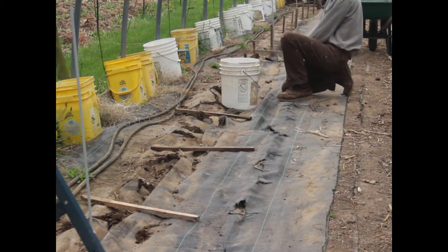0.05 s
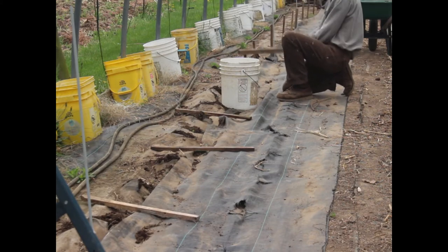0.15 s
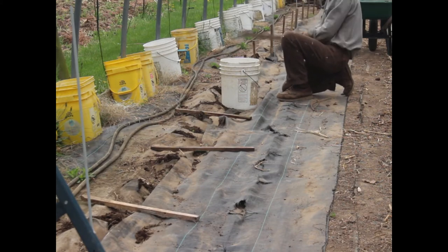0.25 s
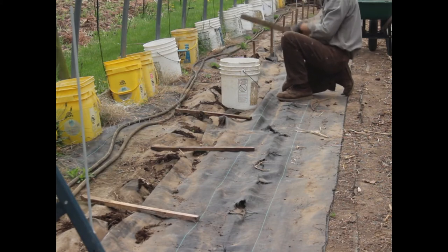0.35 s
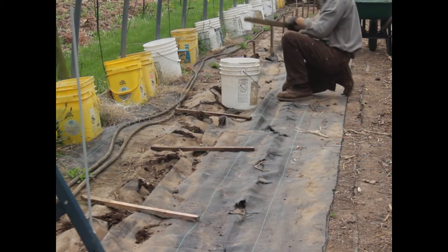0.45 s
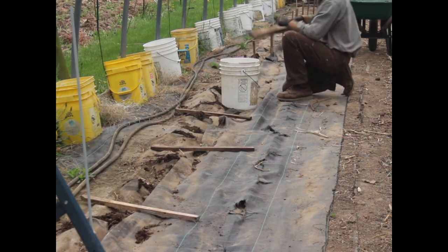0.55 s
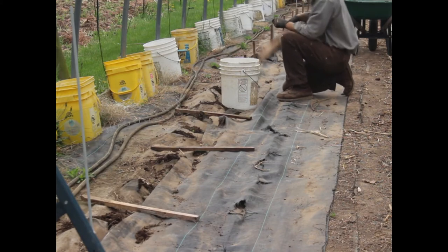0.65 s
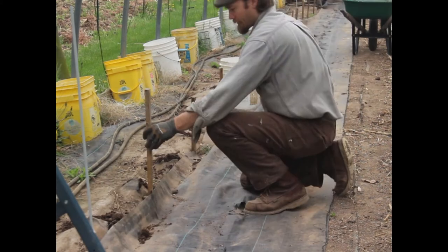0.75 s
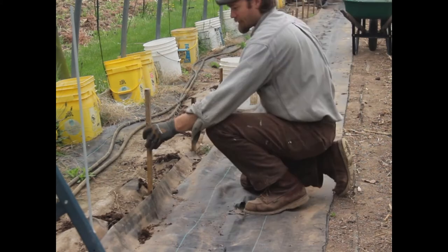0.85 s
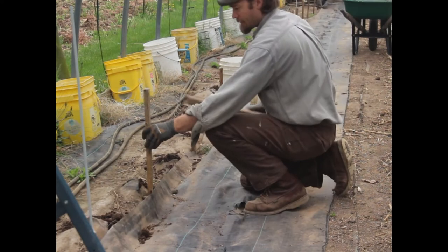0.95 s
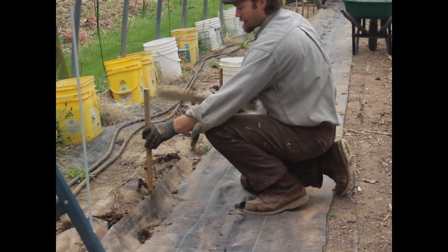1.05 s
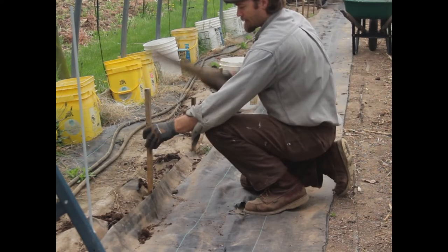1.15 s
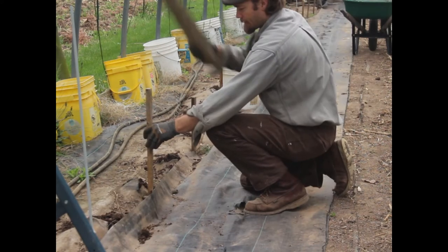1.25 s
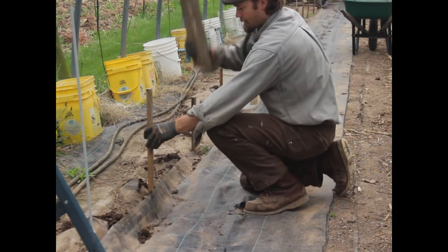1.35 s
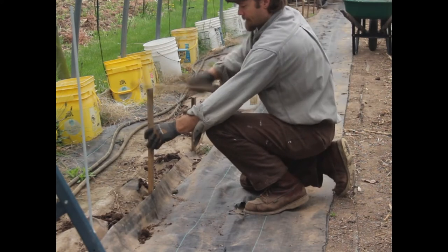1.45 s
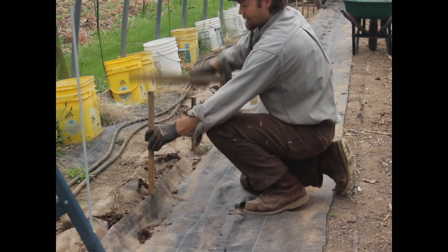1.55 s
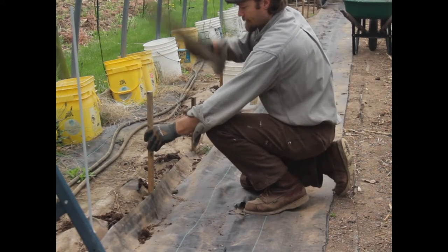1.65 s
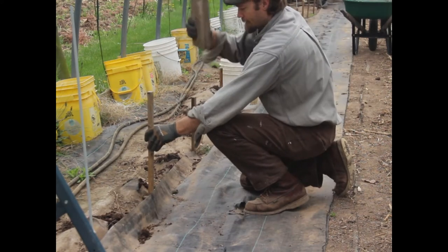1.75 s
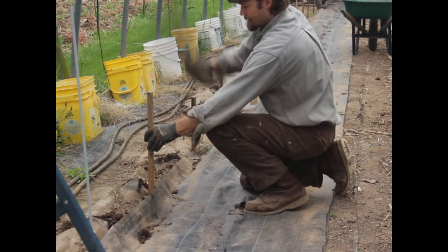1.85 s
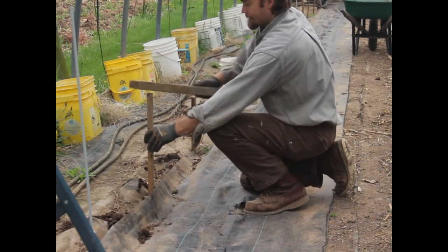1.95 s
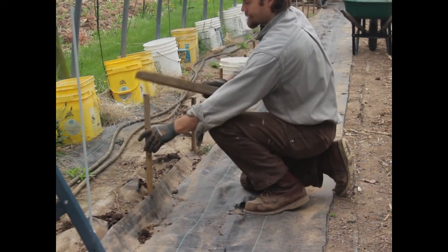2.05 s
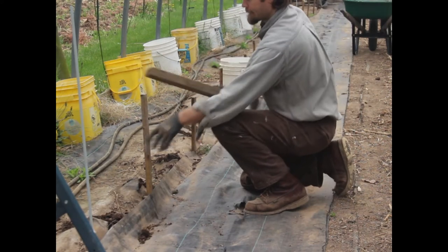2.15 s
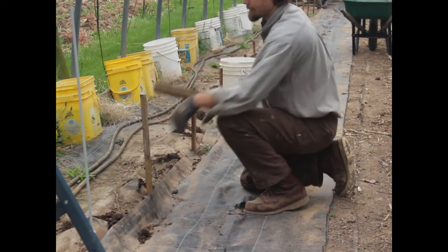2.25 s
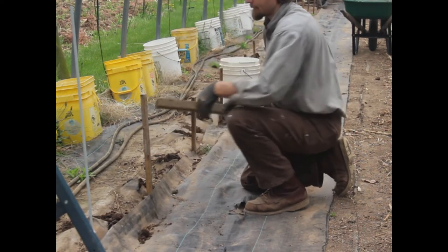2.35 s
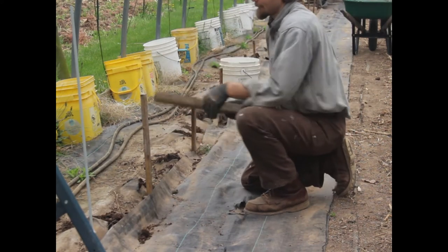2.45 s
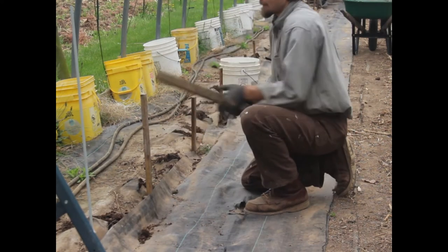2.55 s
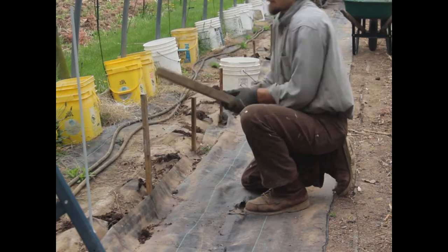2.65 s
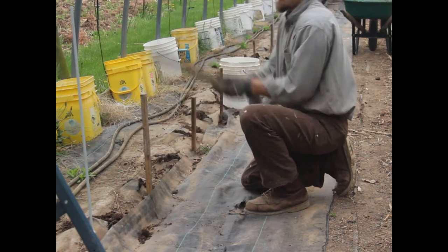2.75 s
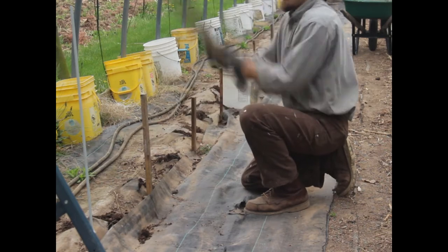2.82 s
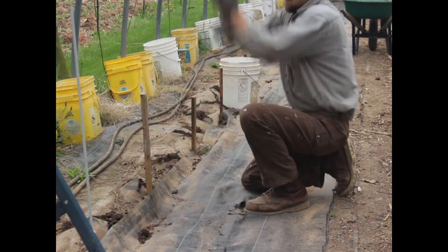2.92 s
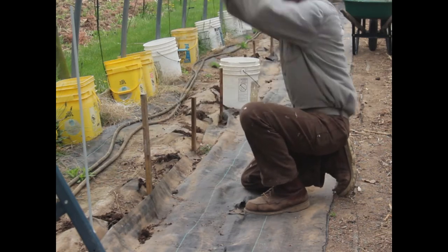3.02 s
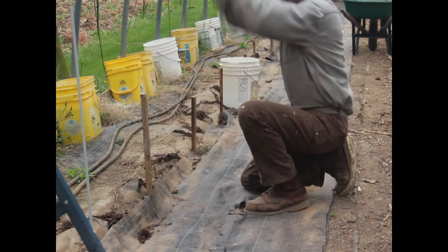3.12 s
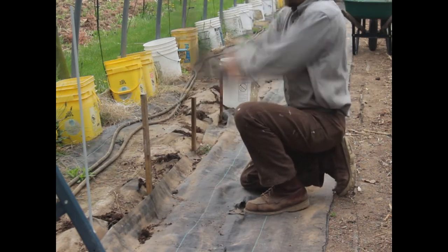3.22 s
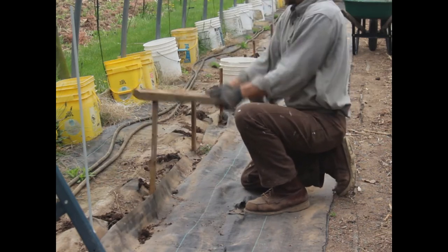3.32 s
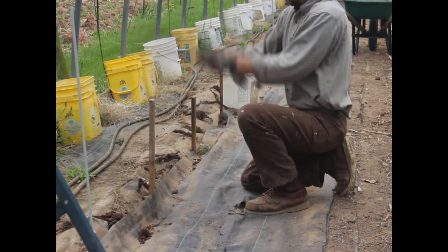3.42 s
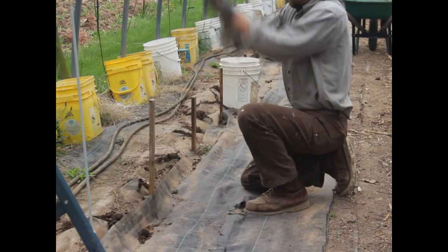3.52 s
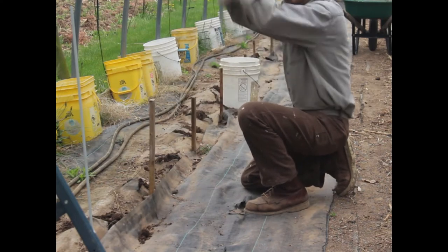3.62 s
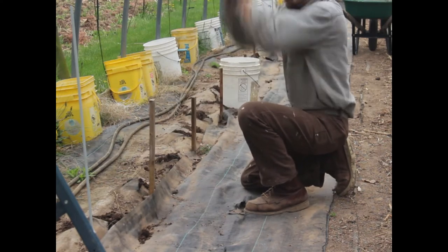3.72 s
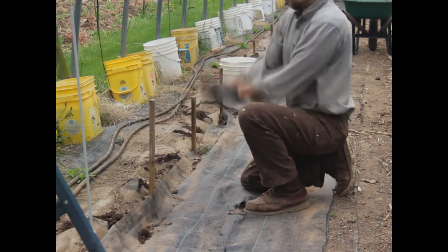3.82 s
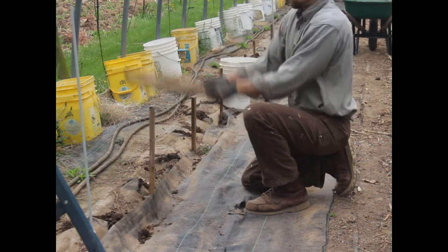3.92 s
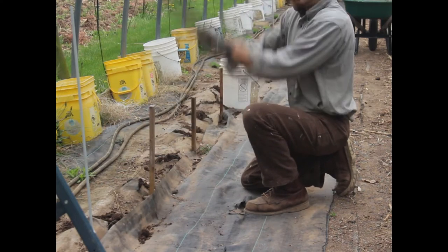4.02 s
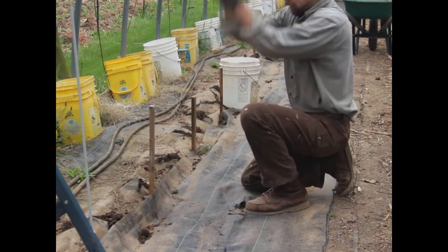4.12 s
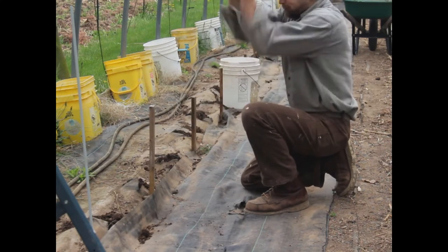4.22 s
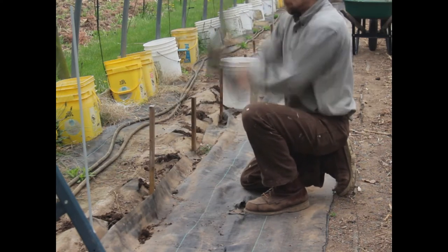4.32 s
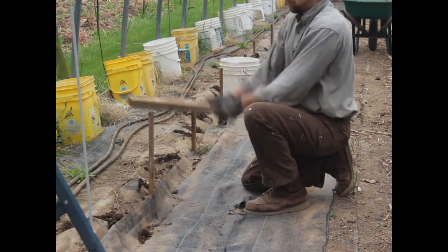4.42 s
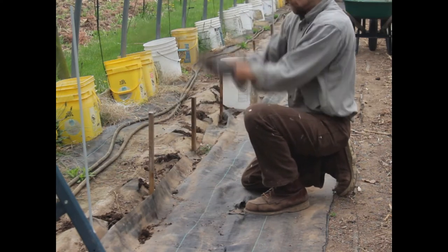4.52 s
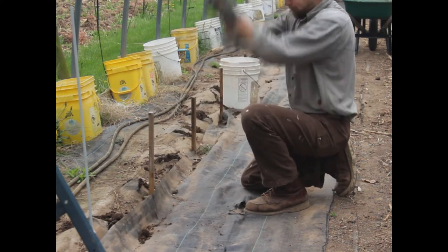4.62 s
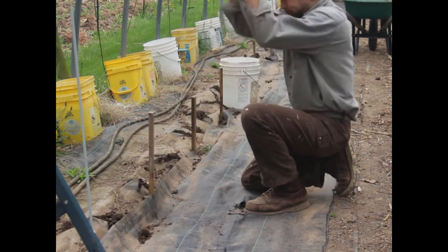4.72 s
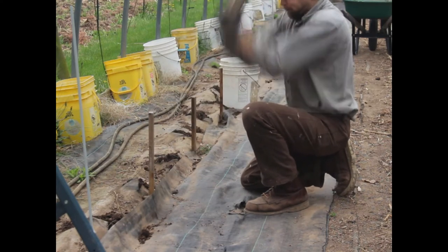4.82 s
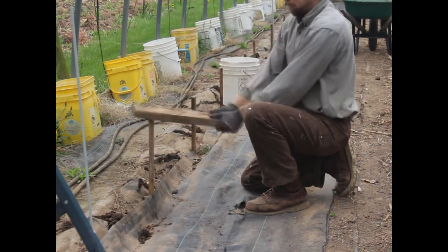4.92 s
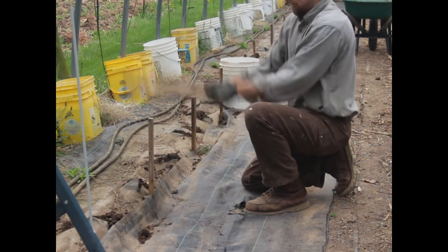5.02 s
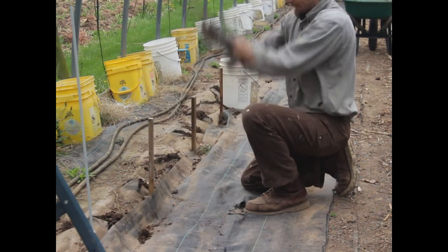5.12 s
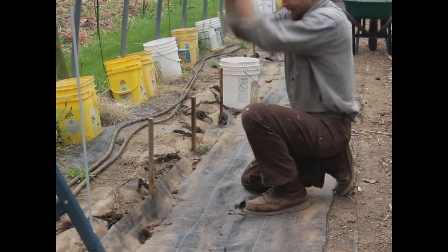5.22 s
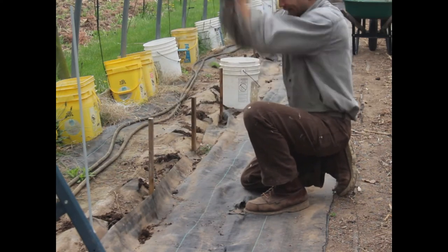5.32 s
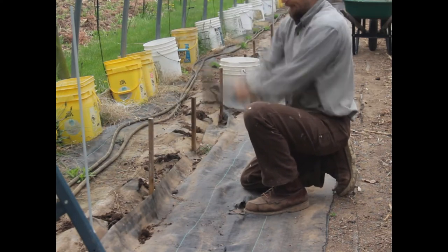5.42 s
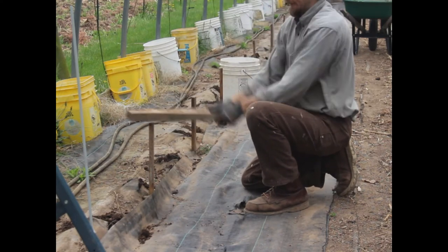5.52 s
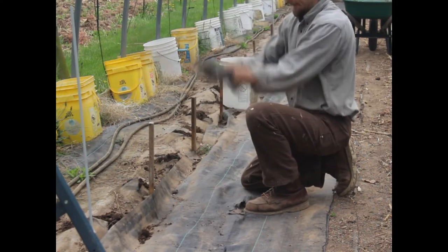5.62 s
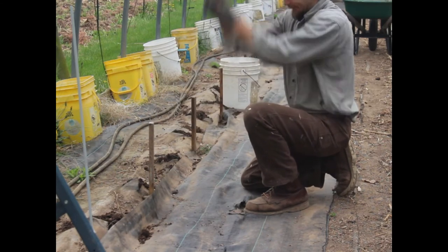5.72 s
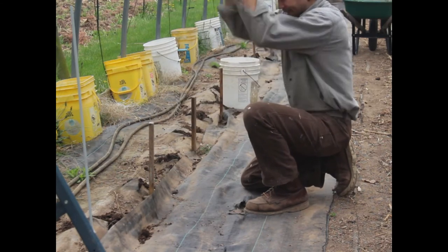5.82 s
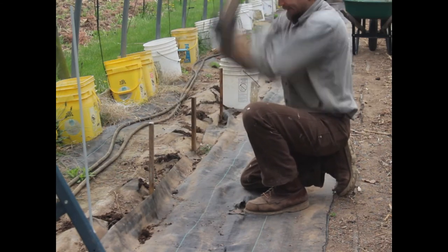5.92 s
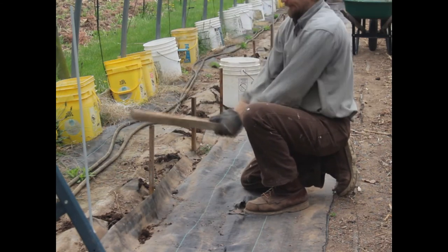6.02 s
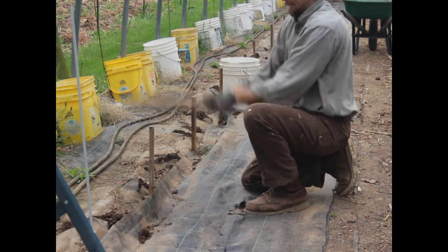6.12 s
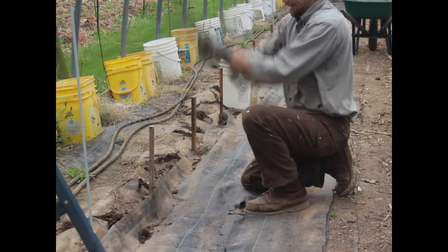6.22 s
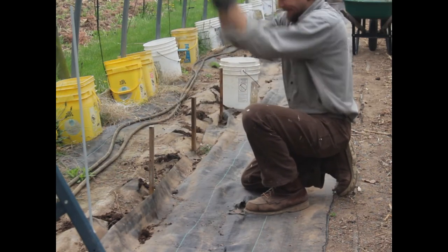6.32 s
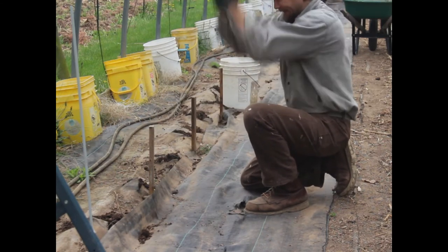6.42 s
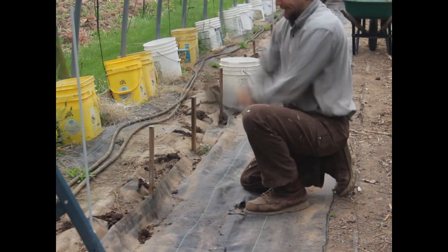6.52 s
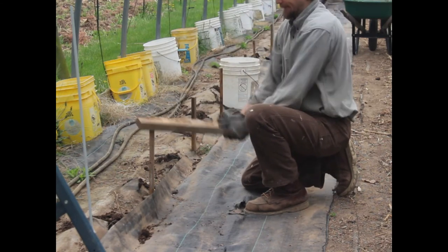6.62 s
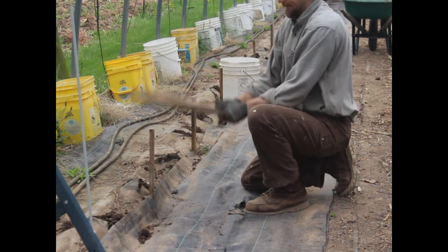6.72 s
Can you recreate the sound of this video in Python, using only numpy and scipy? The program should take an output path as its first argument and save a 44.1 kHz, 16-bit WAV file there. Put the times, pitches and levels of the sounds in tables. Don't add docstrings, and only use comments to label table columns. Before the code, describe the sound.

A wooden club cracks down on thin stakes, ten sharp knocks with soil thumps, each ringing through a long tunnel, faint birds between.

```python
import sys
import numpy as np
from scipy import signal
from scipy.fft import rfft, irfft
from scipy.io import wavfile
from scipy.ndimage import uniform_filter1d

SR = 44100
rng = np.random.default_rng(int(sys.argv[2]) if len(sys.argv) > 2 else 0)


def generate_wav(sig):
    pcm = np.round(np.clip(np.atleast_2d(sig).T, -1, 1) * 32767).astype(np.int16)
    wavfile.write(sys.argv[1], SR, pcm)


def level_to_linear(level):
    exponent = np.asarray(level, float) / 20
    return 10 ** exponent


N = 298468
SCENE_CHANGE_S = .772

# start in
# seconds, force in dB, sharpness in dB, landing spot from about -0.4 to 1.6, echo level in dB.
BLOWS = [
    (.0940, 3, 7, 0.21, 0),
    (1.4899, -0.5, -8.5, -0.42, -8.5),
    (1.9181, 1.5, 0.5, 1.58, -7),
    (3.2825, 2, -4.5, 0.15, -3.5),
    (3.8684, 6, -12.5, -0.044, -0.9),
    (4.3987, 6.5, 1.5, -0.059, -1.1),
    (4.9387, 7, 1, -0.028, 0.5),
    (5.4832, 8.5, 0.5, 0.24, -2),
    (6.0388, 6, 5.5, 0.23, 1.5),
    (6.5852, 5.5, 7.5, 0.071, 0.3),
]


def evened(x):
    return x / np.sqrt(np.mean(x ** 2) + 1e-20)


def read(points, hz):
    f, value = np.transpose(points)
    return np.interp(np.log(hz + 1), np.log(f + 1), value)


def add(mix, s, sound):
    part = mix[max(round(s * SR), 0):][:len(sound)]
    part += sound[:len(part)]


def resonate(x, hz, width_hz):
    turn = np.exp(2j * np.pi * np.cumsum(hz * np.ones(len(x))) / SR)
    r = np.exp(-np.pi * width_hz / SR)
    return 2 * (turn * signal.lfilter([1 - r], [1, -r], x / turn + 1e-18)).real


def resonate_twice(x, hz, width_1_hz, width_2_hz):
    return evened(resonate(resonate(x, hz, width_1_hz), hz, width_2_hz))


def ring(modes, t, shift=0.93, phase=0.):
    return sum(level_to_linear(db - 60 * t / t60_s) * np.sin(2 * np.pi * hz * shift * t + phase) for hz, db, t60_s in modes)


def noise(field_db, size):
    a, b = rng.standard_normal(field_db.shape[::-1] + (2,)).T
    return signal.istft((a + 1j * b) * level_to_linear(field_db), nperseg=size, noverlap=size * 3 // 4)[1]


def stroke(s):
    # valid from in seconds, low mode level in dB, gain drop in dB, echo tilt in dB per octave,
    # echo treble in dB.
    strokes = [
        (0, -10.5, 8.5, 0, 14.5),
        (1.2, -15, 8, -2.5, 15),
        (1.7, -3.5, 10.5, -2.2, 24),
        (3, -0.5, 11, 0.5, 9.5),
        (3.6, 1, 18, 2.1, 10),
    ]
    return [row[1:] for row in strokes if row[0] <= s][-1]


def blow(low_db, force_db, sharp_db, spot):
    # frequency in Hz, level in dB, t60 in seconds, dB per unit of landing spot.
    wood_modes = [(525, 2.5, .02, 0.1), (1430, -3.5, .04, -6), (1650, -2.5, .048, 5),
                  (2660, -10, .045, 1.5), (790, -3, .016, 1.5), (960, -5, .014, -2.5),
                  (1150, -12, .012, 1.5), (1900, -3, .012, 1.5), (2200, -3, .014, -1.2),
                  (2950, -24, .03, 0.1)]
    # frequency in Hz, level in dB, t60 in seconds.
    edge_modes = [(2130, -3.5, 0.0018), (3580, -16, 0.0025), (4164, 2, 0.0031), (5920, -7.5, 0.003)]
    t = np.arange(4000) / SR
    wood = np.zeros(4000)
    for hz, db, t60_s, lean_db in wood_modes:
        mode = (hz, db + lean_db * spot + low_db * (hz < 700), t60_s)
        wood += ring([mode], t, phase=np.pi) * (1 - np.exp(-t * hz / 0.42))
    band = signal.butter(2, [350, 2400], "band", fs=SR, output="sos")
    body = level_to_linear(-5 - 60 * t / 0.023) * evened(signal.sosfilt(band, rng.standard_normal(4000)))
    thump = ring([(189, -14.5 + 1.3 * sharp_db, .045)], t) * (1 - np.exp(-(t / .005) ** 2))
    crack_db = -17 + 0.21 * sharp_db - 60 * t / 0.0029
    crack, other = level_to_linear(crack_db) * np.diff(rng.standard_normal((2, 4001)))
    edge = level_to_linear(-6 + sharp_db) * ring(edge_modes, t, rng.uniform(.97, 1.05))
    sound = wood + body
    add(sound, .003, level_to_linear(-15.5) * sound)
    sound += edge + crack
    return level_to_linear(force_db) * (sound + thump), level_to_linear(force_db) * other


def swish(low_db, drop_db):
    level_db = -54.5 + 0.65 * drop_db + 1.48 * low_db
    rising = resonate(rng.standard_normal(4000), np.linspace(400, 700, 4000), 620)
    to_impact_s = np.arange(-4000, 0) / SR
    return level_to_linear(level_db) * evened(resonate(rising, 500, 1800)) * np.exp(-((to_impact_s + .028) / .028) ** 2)


def tunnel():
    # delay in seconds, level in dB, spread in seconds, dullness in dB per octave.
    bunches = [(.01, 6, 0.02, -3.5), (0.041, 11.5, 0.014, -1), (0.089, 8, 0.024, 1.5),
               (0.131, 3.5, 0.019, 2.5), (.17, 3.5, 0.011, -7.5), (.22, 3, 0.012, -11.5),
               (.32, -48, 0.087, -43)]
    # frequency in Hz, t60 in seconds.
    tunnel_t60 = [(150, 0.17), (500, 1.2), (1000, 3), (1570, 2.15), (2600, 1.006), (5000, 0.95),
                  (10000, 0.74)]
    # frequency in Hz, level in dB.
    colour = [(100, -4), (300, -10.5), (480, -6.5), (800, -1.5), (1050, -5), (1330, 3), (1610, -1),
              (1950, -7.5), (2600, -2.5), (3300, -14.5), (3900, -20), (5500, -32.5), (8000, -45),
              (15000, -60)]
    hz, t = np.fft.rfftfreq(256, 1 / SR)[:, None], np.arange(SR // 64) * 64 / SR
    power = level_to_linear(-5.0) ** 2 * (t > .03)
    for delay_s, db, spread_s, dull_db in bunches:
        late = np.clip(t - delay_s, 0, None) / spread_s
        power = power + level_to_linear(db + dull_db * np.log2(hz / 1500 + 0.2)) ** 2 * late * np.exp(1 - late)
    lumps = uniform_filter1d(rng.standard_normal((len(t), 129)).T, 14, 0)
    lumps = evened(uniform_filter1d(lumps, 5, 1))
    field_db = 10 * np.log10(power + 1e-12) + 1.42 * lumps - 60 * t / read(tunnel_t60, hz)
    tail = noise(field_db, size=256)
    tail = irfft(rfft(tail) * level_to_linear(read(colour, np.fft.rfftfreq(len(tail), 1 / SR))), len(tail))
    return level_to_linear(-7) * tail / np.linalg.norm(tail)


def tilted(x, db_per_octave, treble_db, twin_db):
    hz = np.fft.rfftfreq(len(x), 1 / SR)
    tilt_db = db_per_octave * np.log2(hz / 1500 + 0.25)
    lift_db = treble_db / (1 + (3500 / (hz + 1)) ** 4)
    twin = twin_db * np.exp(-((hz - 1230) / 150) ** 2)
    return irfft(rfft(x) * level_to_linear(tilt_db + lift_db + twin), len(x))


def wall_echo(direct, tails):
    # delay in seconds, level in dB.
    slaps = [(0.041, -41), (0.055, -26), (0.099, -28)]
    sent = level_to_linear(-10.) * direct * np.exp(-np.arange(len(direct)) / SR / .004)
    sent[0] += level_to_linear(26.0)
    turn = rng.uniform(-.8, .8)
    echo = signal.fftconvolve(sent, np.cos(turn) * tails[0] + np.sin(turn) * tails[1])[:SR]
    for delay_s, db in slaps:
        add(echo, delay_s, level_to_linear(db) * uniform_filter1d(direct, size=9))
    return echo


def fuzzy_ring(t, spot, echo_db):
    width_hz = 85 * np.exp(-0.19 * spot)
    level_db = echo_db - 26 + 2.5 * spot + 14.5
    fuzz = resonate_twice(rng.standard_normal(SR), 1590, width_hz, 2 * width_hz)
    fuzz += level_to_linear(-13 - 10 * t) * resonate_twice(rng.standard_normal(SR), 2608, width_hz, 2 * width_hz)
    lull = 1 - .85 * np.exp(-((t - .033) / .008) ** 2) - np.exp(-t / .005)
    return level_to_linear(level_db - 60 * t / 0.65) * fuzz * lull


def boom(t, drop_db):
    # frequency in Hz, level in dB, t60 in seconds.
    boom_modes = [(52.2, 3, 1.03), (74.1, 12.5, 0.66)]
    return level_to_linear(-44 + 0.54 * drop_db) * ring(boom_modes, t) * (1 - np.exp(-(t / 0.045) ** 2))


def hammering():
    out, side, t = np.zeros(N), np.zeros(N), np.arange(SR) / SR
    tails = tunnel(), tunnel(), tunnel()
    for s, force_db, sharp_db, spot, echo_db in BLOWS:
        low_db, drop_db, tilt_db, treble_db = stroke(s)
        direct, other = blow(low_db, force_db, sharp_db, spot)
        echo = wall_echo(direct, tails)
        after = fuzzy_ring(t, spot, echo_db) + boom(t, drop_db)
        after[:len(echo)] += level_to_linear(echo_db) * tilted(echo, tilt_db, treble_db + 0.29 * sharp_db, spot)
        alive = t < (SCENE_CHANGE_S - s if s < SCENE_CHANGE_S else 1)
        add(out, s - 4000 / SR, swish(low_db, drop_db))
        add(out, s, direct)
        add(out, s, after * alive)
        add(side, s, level_to_linear(-1.5) * other)
        add(side, s, level_to_linear(echo_db + 3.0) * tails[2])
    return out, signal.sosfilt(signal.butter(4, 4800, "high", fs=SR, output="sos"), side)


def ticks():
    # start in seconds, level in dB.
    clicks = [(0.9632, -35), (2.7506, -41), (5.38, -35.5), (5.876, -37)]
    # start in seconds, level in dB, frequency in Hz.
    knocks = [(0.136, -33, 217), (0.2, -41, 233), (0.294, -35.5, 104), (0.419, -41, 162),
              (0.55, -48.5, 106), (0.65, -53, 109), (6.236, -41, 154), (6.649, -18.5, 168)]
    out, t = np.zeros(N), np.arange(2000) / SR
    for s, db in clicks:
        add(out, s, level_to_linear(db - 9 - 60 * t / 0.019) * rng.standard_normal(2000))
    for s, db, hz in knocks:
        add(out, s, ring([(hz, db + 10.5, .07)], t) * (1 - np.exp(-(t / 0.0025) ** 2)))
    return out


def birds():
    # start in seconds, length in seconds, frequency in Hz, glide in Hz, level in dB.
    whistles = [(0, .09, 1970, -57, -37.5), (0.032, 0.043, 4670, 45, -53.5), (0.409, 0.05, 4730, 12, -48),
                (0.436, 0.022, 4600, -1500, -56), (0.462, .05, 2800, 170, -48),
                (0.767, .18, 2768, -22, -47), (0.954, 0.25, 2717, -65, -47.5), (2.452, 0.12, 3750, 9, -57),
                (2.588, 0.17, 3740, 9, -56), (2.5, .33, 5100, 50, -67), (2.443, .5, 2320, -78, -57),
                (2.754, 0.283, 2720, -54, -55.5), (3.06, 0.28, 2620, 22, -58),
                (4.79, 0.28, 3340, -27, -71.5), (4.793, 0.29, 2720, 36, -50)]
    # time of the top in seconds, level in dB.
    chirps = [(.603, -55), (.74, -59)]
    # start in seconds, length in seconds, level in dB, frequency in Hz.
    flock = [(0.762, 0.68, -56.5, 2680), (2.431, 0.34, -55.5, 2740), (2.74, .54, -50, 2850)]
    out, calls = np.zeros(N), []
    for s, length_s, hz, glide_hz, db in whistles:
        calls.append((s, np.linspace(hz, hz + glide_hz, round(length_s * SR)), db))
    rise_s, fall_s = .022, .052
    t = np.arange(-rise_s, fall_s, 1 / SR)
    hook_hz = 5380 - np.minimum(2.2e6 * t ** 2, 56000 * abs(t))
    for top_s, db in chirps:
        calls.append((top_s - rise_s, hook_hz, db))
    for s, pitch_hz, db in calls:
        blur = evened(resonate(rng.standard_normal(SR // 2)[:len(pitch_hz)], pitch_hz, 65))
        whistle = .65 * np.sin(2 * np.pi * np.cumsum(pitch_hz) / SR) + .85 * blur
        add(out, s, level_to_linear(db) * whistle * signal.windows.tukey(len(pitch_hz), .2))
    fading = level_to_linear(-60 * np.arange(SR // 4) / SR / .25) * rng.standard_normal(SR // 4)
    out = .8 * out + .35 * signal.fftconvolve(out, fading / np.linalg.norm(fading))[:N]
    chatter_db, chatter_s = 2.2, .05
    for s, length_s, db, hz in flock:
        hiss, chance = rng.standard_normal((2, SR))[:, :round(length_s * SR)]
        chatter = evened(signal.lfilter([1], [1, -np.exp(-1 / (chatter_s * SR))], chance))
        smear = resonate_twice(hiss, hz, 800, 800)
        add(out, s, level_to_linear(db - 4 + chatter_db * chatter) * smear * signal.windows.tukey(len(hiss), .05))
    return out


def steady_noise(spectrum, level_db, swell_db, patchy_db):
    hz, t = np.fft.rfftfreq(1024, 1 / SR)[:, None], np.arange(N // 256 + 5) * 256 / SR
    patches = uniform_filter1d(rng.standard_normal((len(t), 513)).T, 10, 0)
    patches = evened(uniform_filter1d(patches, 12, 1))
    field_db = read(spectrum, hz) + patchy_db * patches + swell_db(t) / (1 + (hz / 1400) ** 2)
    return level_to_linear(level_db) * evened(noise(field_db, size=1024)[:N])


def outdoor_wash():
    # frequency in Hz, density in dB per Hz.
    wash_spectrum = [(15, -49), (25, -7), (59, -11), (91, 4), (152, -3.5), (371, -7), (572, -4),
                     (620, -2.5), (834, -4), (1470, -13.5), (2030, -13), (2730, -14), (4820, -23),
                     (15800, -24)]

    def swell_db(t):
        return 1.5 + np.where(t < SCENE_CHANGE_S, 5.5 * (1 - t / SCENE_CHANGE_S), 0.66 * t)

    return steady_noise(wash_spectrum, -46.5, swell_db, patchy_db=.7)


def capsule_hiss():
    # frequency in Hz, density in dB per Hz.
    hiss_spectrum = [(15, -5), (25, 21), (120, -3.5), (1980, -6), (2260, -4), (2460, -17), (2660, -6.5),
                     (3780, -3), (15800, -3.5)]
    return steady_noise(hiss_spectrum, -58.5, lambda t: 0 * t, patchy_db=.4)


def scene():
    outdoors = outdoor_wash()
    blows, side = hammering()
    side = side + capsule_hiss()
    return blows + outdoors + birds() + ticks() + np.array([side, -side])


def band_limit(x):
    return signal.sosfilt(signal.butter(12, 16550, fs=SR, output="sos"), x)


def record(dry):
    grab_s, hold_s = .008, .2
    t, drop_db = np.arange(N) / SR, np.zeros(N)
    for s, *_ in BLOWS:
        since_s = np.clip(t - s, 0, None)
        depth_db = stroke(s)[1]
        duck_db = depth_db * (1 - np.exp(-since_s / grab_s)) * np.exp(-(since_s / hold_s) ** 4)
        drop_db = np.maximum(drop_db, duck_db)
    squared = np.clip(dry / level_to_linear(drop_db), -1, 1)
    hz = np.fft.rfftfreq(N, 1 / SR)
    band_limits = 1 / (1 + (hz / 15900) ** 36) / (1 + (26 / (hz + 1)) ** 4)
    return band_limit(irfft(rfft(squared) * band_limits, N))


dry = scene()
out = record(dry)
generate_wav(out)
```